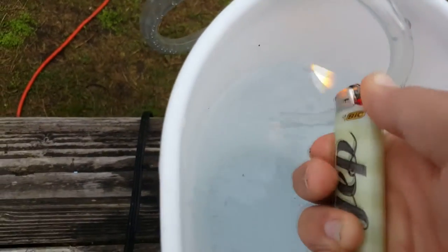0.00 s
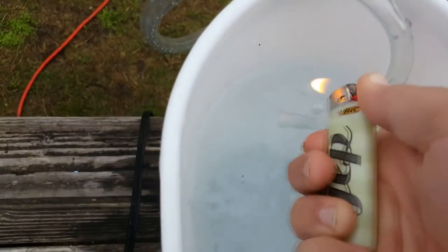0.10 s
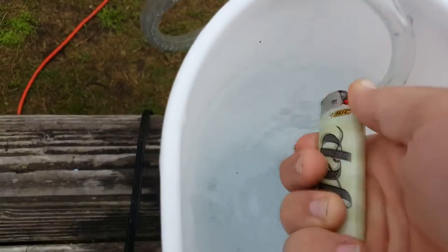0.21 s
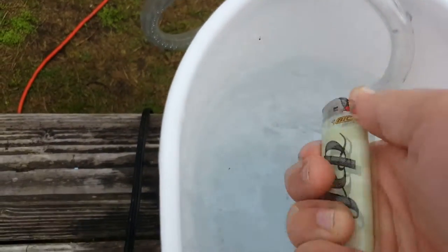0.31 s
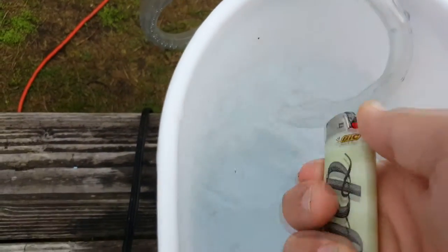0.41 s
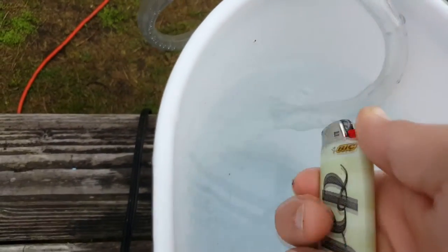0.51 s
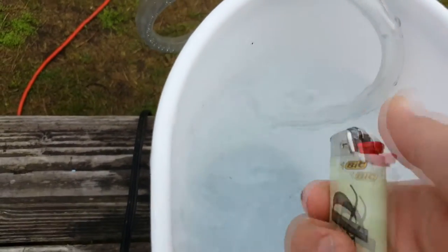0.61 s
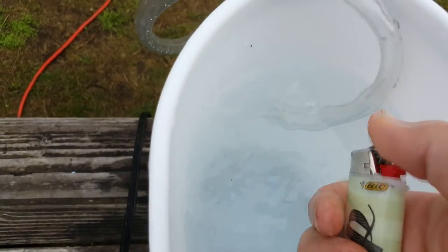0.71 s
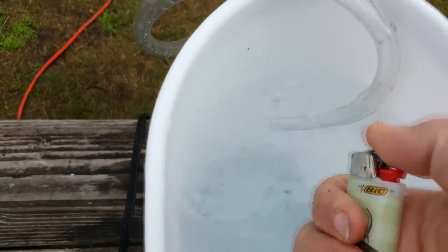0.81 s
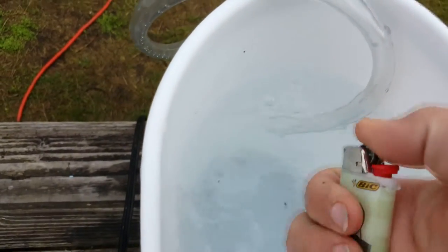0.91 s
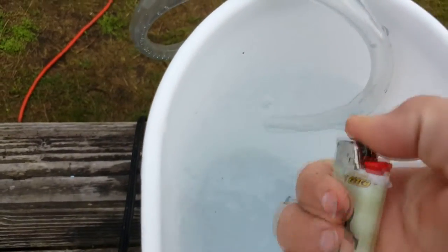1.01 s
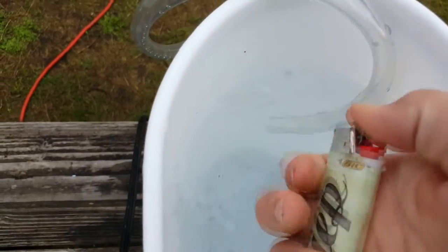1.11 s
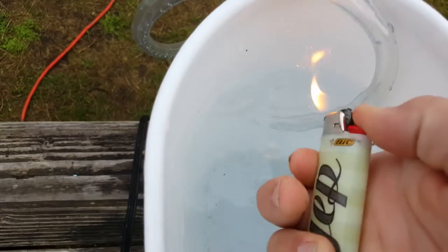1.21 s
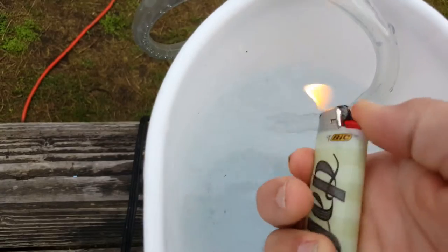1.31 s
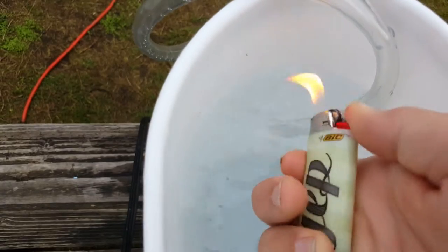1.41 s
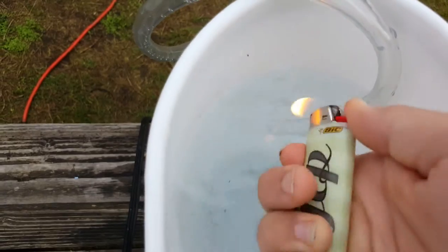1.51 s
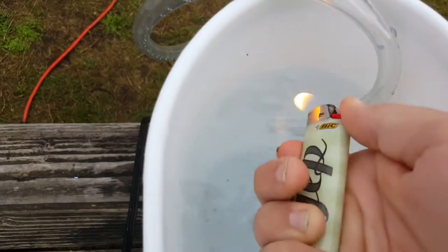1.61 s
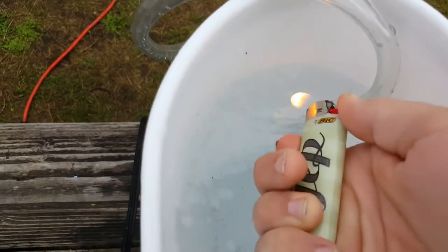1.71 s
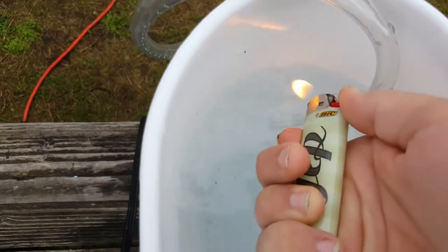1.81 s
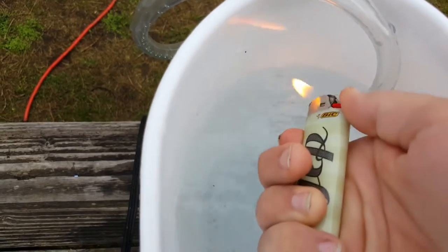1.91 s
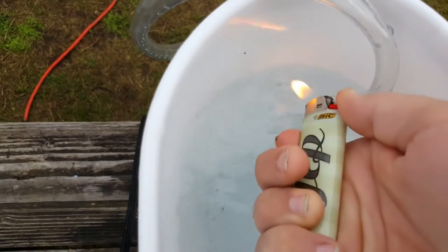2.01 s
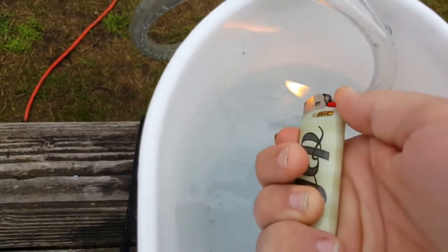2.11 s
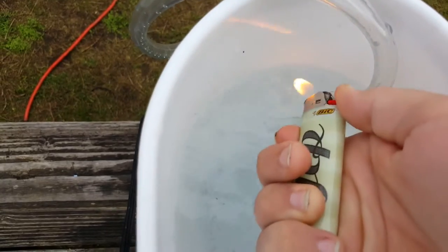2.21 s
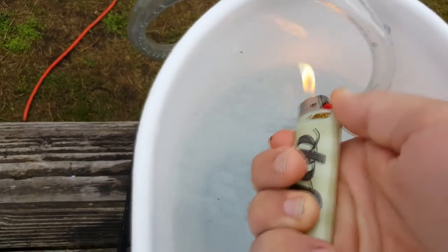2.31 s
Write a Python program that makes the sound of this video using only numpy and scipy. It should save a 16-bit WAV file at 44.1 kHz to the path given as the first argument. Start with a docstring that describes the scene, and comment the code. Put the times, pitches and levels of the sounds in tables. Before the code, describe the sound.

Explosive pops of burning gas: one bright bang with a hollow tub ring and hissing echo, a gritty lighter strike, faint bubbling and generator hum, then a rapid double bang, close and distorted, outdoors.

```python
"""Three gas bubbles explode over water in a plastic tub outdoors: each is a pressure pulse and a burst of
burning noise that excites the tub's air modes and scatters back from the yard. A lighter flame, filtered noise,
is blown out by the first and struck again as grainy noise. Bubbles fed by a humming generator ring as decaying
rising sines over steady background noise. The pops overload the microphone, and its gain control ducks and
slowly recovers."""
import sys
import numpy as np
from scipy import signal
from scipy.fft import rfft, irfft
from scipy.io import wavfile
from scipy.ndimage import uniform_filter1d, minimum_filter1d

SR = 44100
rng = np.random.default_rng(int(sys.argv[2]) if len(sys.argv) > 2 else 0)


def wav_record(signal):
    """Record a signal, one row per channel, as 16-bit PCM in the file named by sys.argv[1]."""
    frames = np.transpose(np.atleast_2d(signal))
    bounded = np.clip(frames, -1, 1)
    # unit amplitude maps onto the largest positive 16-bit level
    quanta = np.round(bounded * 32767).astype(np.int16)
    wavfile.write(sys.argv[1], SR, quanta)


N = 105840
T = np.arange(N) / SR  # t/s
HZ = np.maximum(np.arange(N // 2 + 1) * SR / N, 1)  # f/Hz of each spectral bin

# Stereo coherence of noise: [f/Hz, left-right correlation]
COHERENCE = [(100, .93), (350, 0.71), (700, 0.98), (1300, .1), (3000, .1), (8000, 0.022)]
SCENE_PAN_DB = 1.5  # left over right

# Outdoor background, relative spectral density: [f/Hz, level/dB per Hz]
AIR_SPECTRUM = [(25, -14.5), (60, -3), (120, 2), (200, -0.5), (320, -8), (600, -13), (1100, -20),
                (1370, -15), (1600, -21.5), (3000, -22.5), (4500, -29.5), (8000, -29), (11000, -35),
                (15500, -30.5)]
AIR_DB = -54.5
# Partials of the generator hum: [f/Hz, rms level/dB]
HUM_PARTIALS = [(120, -60), (240, -63), (300.3, -65.5), (360.2, -52), (480, -64.5), (720.5, -73.5),
                (840, -76.5), (1081, -76.5)]

# Bubbles leaving the hose: [t/s, level/dB, starting f/Hz]
HOSE_BUBBLES = [(.035, -45.5, 522), (.413, -40, 486), (.609, -44, 489.3), (.795, -42.5, 491),
                (.987, -41.5, 458), (1.353, -50.5, 453), (1.544, -43, 527), (1.735, -48, 496),
                (1.922, -47.5, 519)]
BUBBLE_T60_S, BUBBLE_RISE_PER_S = .055, 1.5  # rise: fraction of the starting frequency per second
# Soft splats after the flame catches: [t/s, level/dB]
SURFACE_SPLATS = [(1.2234, -31), (1.26, -29.5)]
# Relative spectral density of a splat: [f/Hz, level/dB per Hz]
SPLAT_COLOUR = [(200, -11), (500, 0), (850, 1), (1300, -14), (2200, -23), (3000, -8), (6000, -26),
                (15000, -18)]
SPLAT_DECAY_S = 0.0044

# Small clicks: the lighter's thumb and wheel, tiny droplets, and a possible late echo of the first pop
# at .5524: [t/s, level/dB, f/Hz, bandwidth/Hz, decay constant/s]
SMALL_CLICKS = [(0.143, -50.5, 6900, 900, 0.0017), (.5524, -40, 3290, 400, 0.0044),
                (.8594, -63, 5500, 2590, .002), (1.1413, -31.5, 10600, 1700, 0.0016),
                (1.1511, -36, 3580, 400, 0.0035), (1.4063, -48, 5620, 1200, 0.0018),
                (1.6082, -45.5, 6200, 1110, 0.0019), (1.6616, -56.5, 5980, 2520, .002),
                (1.7469, -42.5, 5400, 1100, 0.0014), (2.0618, -52.5, 5830, 1417, .002)]

# Flame envelope: [t/s, rush level/dB, resonance level/dB]
FLAME_LEVELS = [(0, -51.5, -72), (.23, -54, -58.5), (0.262, -70, -85), (1.19, -67.5, -92), (1.23, -71, -85),
                (1.45, -86, -76.5), (1.53, -56, -63.5), (1.68, -51, -62), (2.0, -51.5, -57),
                (2.4, -51.5, -70)]
# Relative spectral density of the rush: [f/Hz, level/dB per Hz]
FLAME_COLOUR = [(25, -15), (80, 0), (125, 5.5), (250, -8.5), (600, -17), (1400, -17), (1650, -20),
                (2700, -19), (4500, -35.5), (9000, -43.5), (16000, -58)]
FLAME_HZ, FLAME_WIDTH_HZ = 1955, 130

# Relative spectral density of flint scraping: [f/Hz, level/dB per Hz]
WHEEL_COLOUR = [(300, -16), (2400, -3.5), (3100, 7.5), (3500, 5), (4100, 4), (5200, -27.5), (6200, 0.5),
                (7400, -3), (8600, 6.5), (10000, -1.5), (12500, -2), (16000, -28)]
WHEEL_START_S, WHEEL_CATCH_S = 1.12, 1.2077
WHEEL_DB, WHEEL_RISE_S, WHEEL_PAN_DB = -16, 0.004, 4.5
HALF_DRAG_DB = -43  # half the amplitude that the drag reaches at the catch
WHEEL_GRAINS_PER_S, WHEEL_RETURN_DB, WHEEL_RETURN_T60_S = 3400, -33.5, 0.22
CATCH_PUFF_DB, CATCH_PUFF_S, CATCH_SNAP_DB, CATCH_PAN_DB = -13.5, 0.0012, -7, 24

# Air modes of the tub: [f/Hz, bandwidth/Hz, level/dB]
TUB_MODES = [(697, 110, -11), (1233, 165, 0.5), (1945, 125, 1), (2684, 98, -4.5), (3260, 85, -11),
             (4420, 80, -15.5)]
TUB_RING_DB = -2  # added to every mode in the direct ring

# Relative spectral density of the yard's hiss: [f/Hz, level/dB per Hz]
YARD_HISS_COLOUR = [(40, -6.5), (120, -1.5), (330, -3), (480, 7.5), (900, 5), (1600, 2.5), (3800, 1),
                    (5000, -6), (8500, -0.5), (10500, -6), (13000, -5.5), (16000, -9.5)]
# Reflections from walls and fences: [delay t/s, spread/s, lift level/dB]
WALL_ECHOES = [(.030, .0036, 11.5), (.061, .006, 5), (.120, .005, 6.5)]
YARD_ONSET_S = .012
# Decay stages of the yard: (level/dB, t60/s)
TONE_EARLY, TONE_LATE = (-3.5, .27), (-16, .64)
HISS_EARLY, HISS_LATE = (-10.5, 0.21), (-24, 0.58)
ROLL, WASH = (-42.5, 1.6), (-33, 0.65)
ROLL_HZ, ROLL_WIDTH_HZ = 103, 75  # distant low roll
WASH_HZ, WASH_WIDTH_HZ = 2750, 990  # upper-mid wash from afar
LATE_TONE_LOW_HZ, LATE_HISS_LOW_HZ, LATE_HISS_TOP_HZ = 1100, 2800, 9400

# Exploding bubbles: [t/s, blast level/dB, burn decay constant/s, lowest f/Hz, low-pass f/Hz,
# ring level/dB (before mode levels), ring t60/s, thump f/Hz, thump level/dB,
# returning tone level/dB, returning hiss level/dB, hiss low-pass f/Hz]
EXPLOSIONS = [(0.2366, 18.5, 0.0038, 45, 9540, 11.5, 0.032, 245, 11, -1, 1.5, 13000),
              (2.0927, 10, 0.0016, 278, 1878, 4, 0.018, 544, 6, -33.5, -14, 2000),
              (2.1240, 15.5, 0.0018, 224, 6070, 15.5, 0.011, 167.6, -5.5, -6.5, 0, 5130)]
# Relative spectral density of burning gas: [f/Hz, level/dB per Hz]
BURN_COLOUR = [(40, 0), (110, 3.5), (400, 0.5), (1000, 4), (3000, -1), (5500, -5.5), (8000, -5),
               (10500, -11.5), (13000, -2.5), (16000, -6.5)]
PUSH_DB, PUSH_S = -11.5, .002  # pressure pulse, relative to the blast
BOOM_HZ, BOOM_DB, BOOM_S = 83, -12.5, 0.0054  # deep boom of the tub, relative to the blast

AGC_THRESHOLD_DB, AGC_WINDOW_S, AGC_ATTACK_S = -18.5, 0.0089, .011
AGC_HOLD_S, AGC_RELEASE_S = 0.53, 0.34
OVERLOAD_LEVEL, CUTOFF_HZ = .88, 16600


def from_db(db):
    """Amplitude is the antilogarithm of level/dB over 20."""
    return 10 ** (np.asarray(db) / 20)


def rms_one(x):
    """Normalization divides a signal by its root mean square."""
    return x / np.sqrt(np.mean(x ** 2) + 1e-20)


def pan(db):
    """An interchannel level difference, left over right, is shared equally by two gains."""
    return from_db(np.array([[db], [-db]]) / 2)


def over_hz(points):
    """A spectral curve is interpolated linearly along log frequency."""
    hz, value = np.transpose(points)
    return np.interp(np.log(HZ), np.log(hz), value)


def bump(hz, width_hz):
    """A resonance band is approximated by a Gaussian in frequency."""
    return np.exp(-.5 * ((HZ - hz) / width_hz) ** 2)


def noise(gain):
    """Mixing independent sum and difference noises sets the interchannel coherence at each frequency."""
    mid, side = rfft(rng.standard_normal((2, N)))
    alike = np.clip(over_hz(COHERENCE), -1, 1)
    common = np.sqrt(1 + alike) * mid
    opposed = np.sqrt(1 - alike) * side * [[1], [-1]]
    return rms_one(irfft(gain * (common + opposed), N))


def decay(s, tau):
    """Free decay starts suddenly and falls exponentially with time constant tau."""
    return (T >= s) * np.exp(-np.maximum(T - s, 0) / tau)


def fade(s, t60):
    """Exponential decay is specified by its time to fall 60 dB."""
    return decay(s, t60 / np.log(1000))


def pulse(s, length):
    """A blast wave is a pressure step followed by a longer suction."""
    return decay(s, length) * (1 - (T - s) / length)


def dull(x, hz):
    """A second-order low-pass attenuates the treble gently."""
    sections = signal.butter(2, min(hz, SR / 2 - 1000), fs=SR, output="sos")
    return signal.sosfilt(sections, x + 1e-18)


def thin(x, hz):
    """A second-order high-pass attenuates the bass gently."""
    sections = signal.butter(2, hz, "high", fs=SR, output="sos")
    return signal.sosfilt(sections, x + 1e-18)


def outdoor_air():
    """Stationary background is Gaussian noise shaped by a fixed spectrum."""
    return from_db(AIR_DB) * noise(from_db(over_hz(AIR_SPECTRUM)))


def generator():
    """Steady hum is a sum of constant sinusoids with random starting phases."""
    hum = 0
    for hz, db in HUM_PARTIALS:
        hum = hum + np.sqrt(2) * from_db(db) * np.sin(2 * np.pi * (hz * T + rng.random()))
    return hum


def water(attack_s=0.0014):
    """Bubbles ring as damped oscillators of rising frequency; two noise bursts splat at the surface."""
    out = 0
    for s, db, hz in HOSE_BUBBLES:
        age = np.maximum(T - s, 0)
        phase = 2 * np.pi * hz * (age + BUBBLE_RISE_PER_S * age ** 2 / 2)  # integral of the rising frequency
        envelope = fade(s, BUBBLE_T60_S) - decay(s, attack_s)
        out = out + from_db(db) * np.sin(phase) * envelope
    splat_envelope = sum(from_db(db) * decay(s, SPLAT_DECAY_S) for s, db in SURFACE_SPLATS)
    return out + noise(from_db(over_hz(SPLAT_COLOUR))) * splat_envelope


def ticks(pan_db=2):
    """A small click is a band of noise under a short exponential decay."""
    clicks = sum(from_db(db) * noise(bump(hz, width)) * decay(s, tau) for s, db, hz, width, tau in SMALL_CLICKS)
    return pan(pan_db) * clicks


def flame(resonance_pan_db=3.0):
    """Flame noise is a broadband rush and a resonant band, each following its own level curve."""
    s, rush_db, resonance_db = np.transpose(FLAME_LEVELS)
    rush = noise(from_db(over_hz(FLAME_COLOUR))) * from_db(np.interp(T, s, rush_db))
    resonance = noise(bump(FLAME_HZ, FLAME_WIDTH_HZ)) * from_db(np.interp(T, s, resonance_db))
    return rush + resonance * pan(resonance_pan_db)


def lighter_strike(grit=0.61, grain_s=0.00026, snap_s=0.00013, puff_hz=2500):
    """Friction noise, modulated by random grains, grows until the gas catches with a snap and a puff."""
    grains = (rng.random(N) < WHEEL_GRAINS_PER_S / SR) * rng.exponential(1, N)
    grains = rms_one(signal.lfilter([1], [1, -np.exp(-1 / (grain_s * SR))], grains))
    effort = from_db(WHEEL_DB) * np.exp(np.minimum(T - WHEEL_CATCH_S, 0) / WHEEL_RISE_S)
    progress = np.clip((T - WHEEL_START_S) / (WHEEL_CATCH_S - WHEEL_START_S), 0, 1)
    effort += from_db(HALF_DRAG_DB) * 2 * progress ** 2
    colour = from_db(over_hz(WHEEL_COLOUR))
    texture = 1 - grit + grit * grains
    scrape = noise(colour) * effort * (T < WHEEL_CATCH_S) * texture * pan(WHEEL_PAN_DB)
    echo = noise(np.sqrt(colour)) * from_db(WHEEL_RETURN_DB) * fade(WHEEL_CATCH_S, WHEEL_RETURN_T60_S)
    puff = from_db(CATCH_PUFF_DB) * dull(pulse(WHEEL_CATCH_S, CATCH_PUFF_S), puff_hz)
    snap = from_db(CATCH_SNAP_DB) * pulse(WHEEL_CATCH_S, snap_s)
    return scrape + echo + (puff + snap) * pan(CATCH_PAN_DB)


def yard(tone_pan_db=-1.0, hiss_pan_db=-3.0):
    """Scattering returns the pops as decaying noise: stronger echoes, a faint long tail and a low roll."""
    tone = noise(sum(from_db(db) * bump(hz, width) for hz, width, db in TUB_MODES)) * pan(tone_pan_db)
    hiss = noise(from_db(over_hz(YARD_HISS_COLOUR))) * pan(hiss_pan_db)
    roll = noise(bump(ROLL_HZ, ROLL_WIDTH_HZ))
    wash = noise(bump(WASH_HZ, WASH_WIDTH_HZ))
    out = 0
    for s, *_, tone_db, hiss_db, top_hz in EXPLOSIONS:
        age = np.maximum(T - s, 0)
        echo_db = sum(db * np.exp(-.5 * ((age - delay) / spread) ** 2) for delay, spread, db in WALL_ECHOES)
        swell = from_db(echo_db) * (1 - np.exp(-(age / YARD_ONSET_S) ** 2))
        ringing = from_db(tone_db) * tone
        rush = from_db(hiss_db) * dull(hiss, top_hz)
        late_rush = thin(dull(rush, LATE_HISS_TOP_HZ), LATE_HISS_LOW_HZ)
        stages = (
            (ringing, TONE_EARLY),
            (thin(ringing, LATE_TONE_LOW_HZ), TONE_LATE),
            (from_db(tone_db) * roll, ROLL),
            (rush, HISS_EARLY),
            (from_db(hiss_db) * wash, WASH),
            (late_rush, HISS_LATE),
        )
        out = out + swell * sum(sound * from_db(db) * fade(s, t60) for sound, (db, t60) in stages)
    return out


def pops(thump_cycles=0.94, port_lag_s=.00008):
    """An explosion is a pressure pulse and turbulent burn that set the tub's modes, thump and boom ringing."""
    burn, out = noise(from_db(over_hz(BURN_COLOUR))), 0
    for s, db, burn_s, low_hz, bright_hz, ring_db, ring_t60, thump_hz, thump_db, *_ in EXPLOSIONS:
        age = T - s - np.array([[0], [port_lag_s]])  # the oscillations lag on the right
        blast = from_db(db) * (burn * decay(s, burn_s) + from_db(PUSH_DB) * pulse(s, PUSH_S))
        modes = sum(from_db(level + TUB_RING_DB) * np.cos(2 * np.pi * hz * age) for hz, _, level in TUB_MODES)
        ring = from_db(ring_db) * modes * fade(s, ring_t60)
        thump = from_db(thump_db) * np.cos(2 * np.pi * thump_hz * age) * decay(s, thump_cycles / thump_hz)
        boom = from_db(db + BOOM_DB) * np.sin(2 * np.pi * BOOM_HZ * age) * decay(s, BOOM_S)
        out = out + thin(dull(blast + boom + ring + thump, bright_hz), low_hz)
    return out


def scene():
    """Superposition adds all sources; the lighter strike keeps its own stereo placing."""
    placed = outdoor_air() + generator() + water() + ticks() + flame() + yard() + pops()
    return pan(SCENE_PAN_DB) * placed + lighter_strike()


def gain_control(x):
    """Compression lowers the gain quickly for loud sound, holds it, then lets it creep back."""
    window = int(AGC_WINDOW_S * SR)
    # the shifted windows look only backwards in time
    power = uniform_filter1d(np.mean(np.tanh(x) ** 2, axis=0), window, origin=(window - 1) // 2)
    over_db = np.maximum(10 * np.log10(np.maximum(power, 1e-12)) - AGC_THRESHOLD_DB, 0)
    hold = int(AGC_HOLD_S * SR)
    held = -minimum_filter1d(-over_db, hold, origin=(hold - 1) // 2, mode="constant")
    # a running maximum against a growing exponential gives an exponential release
    growth = np.exp(T / AGC_RELEASE_S)
    cut_db = np.maximum.accumulate(held * growth) / growth
    r = np.exp(-1 / (AGC_ATTACK_S * SR))
    return x * from_db(-signal.lfilter([1 - r], [1, -r], cut_db))


def record(dry):
    """Gain control precedes saturating overload and a steep low-pass."""
    overloaded = OVERLOAD_LEVEL * np.tanh(gain_control(dry) / OVERLOAD_LEVEL)
    top_cut = signal.cheby2(18, 70, CUTOFF_HZ, fs=SR, output="sos")
    return signal.sosfilt(top_cut, overloaded)


dry = scene()
out = record(dry)
wav_record(out)
```